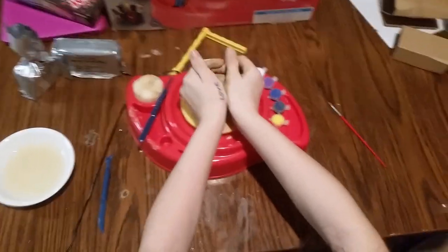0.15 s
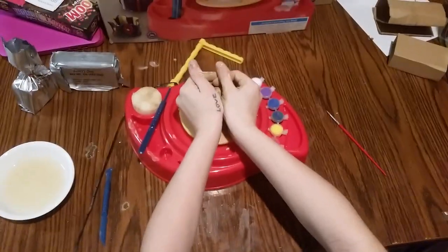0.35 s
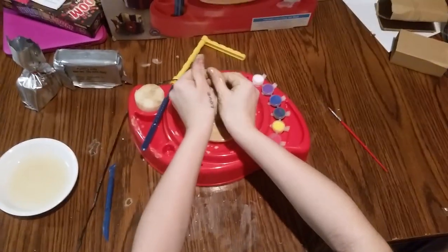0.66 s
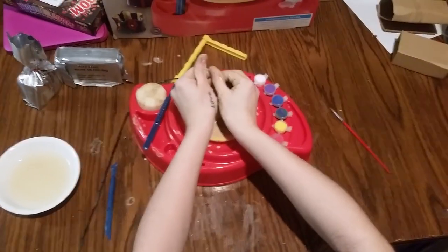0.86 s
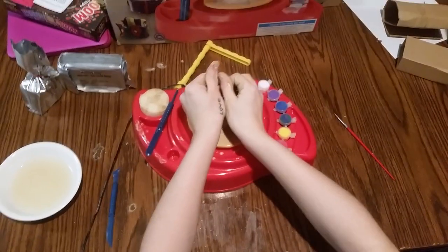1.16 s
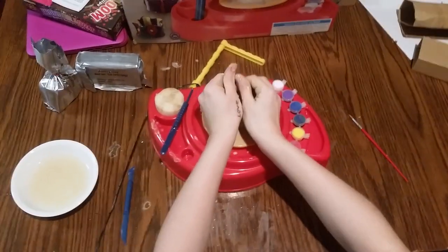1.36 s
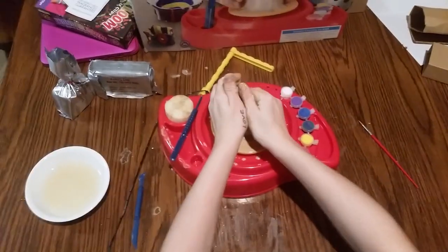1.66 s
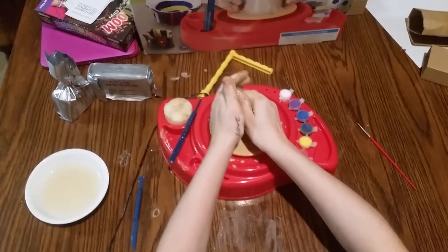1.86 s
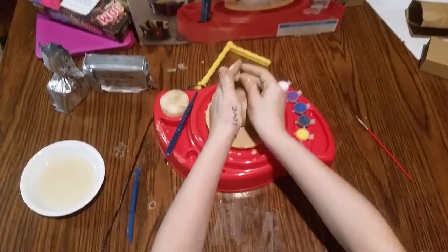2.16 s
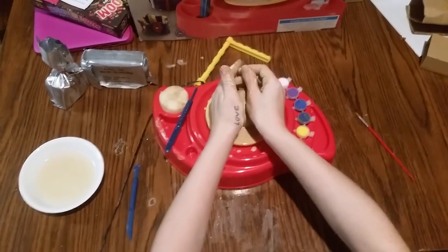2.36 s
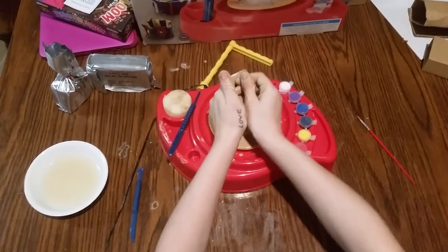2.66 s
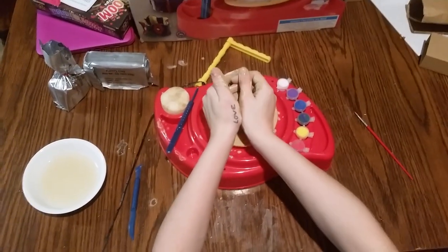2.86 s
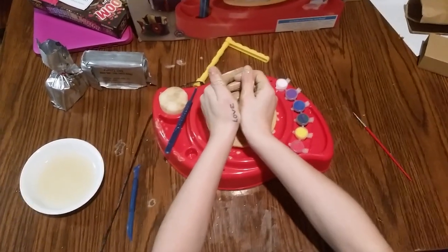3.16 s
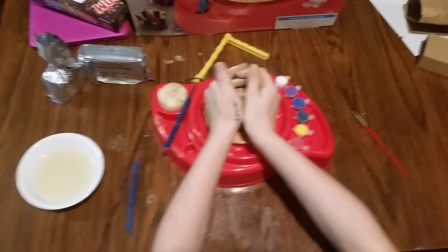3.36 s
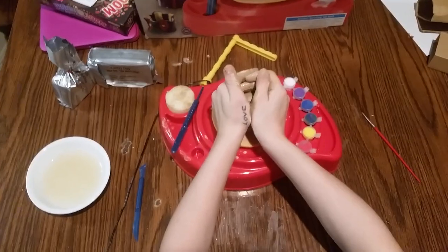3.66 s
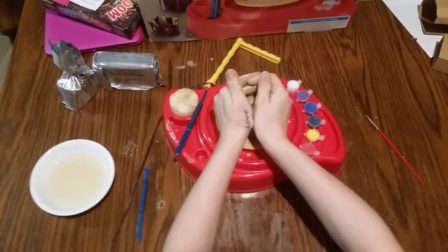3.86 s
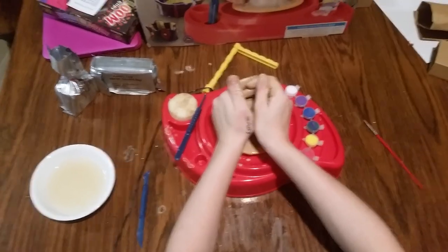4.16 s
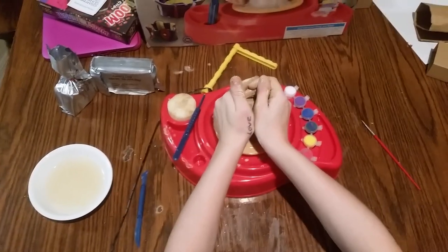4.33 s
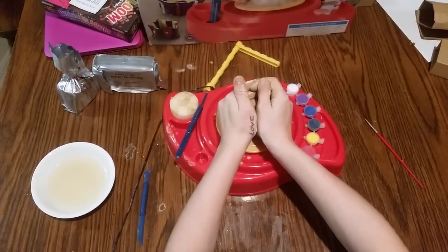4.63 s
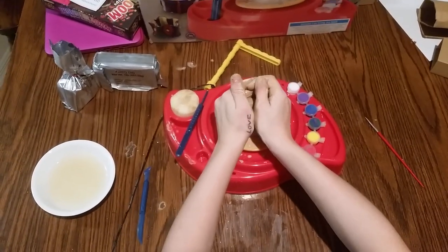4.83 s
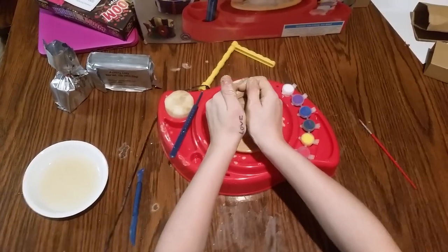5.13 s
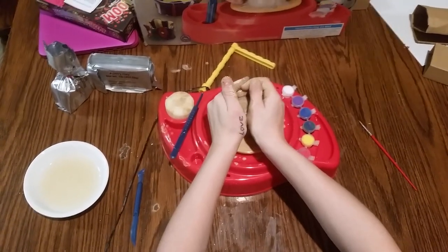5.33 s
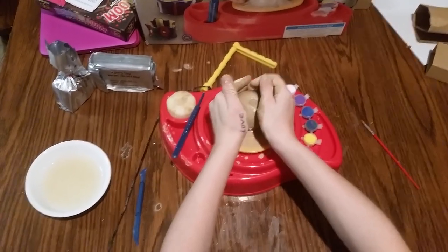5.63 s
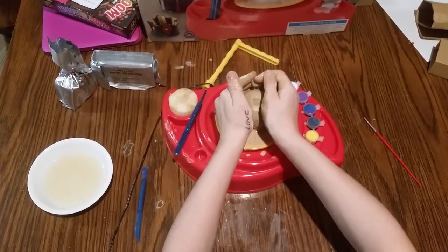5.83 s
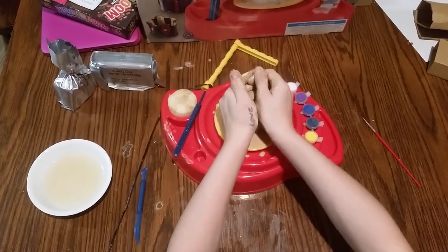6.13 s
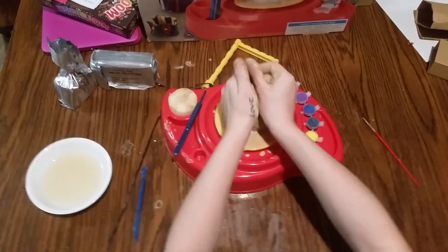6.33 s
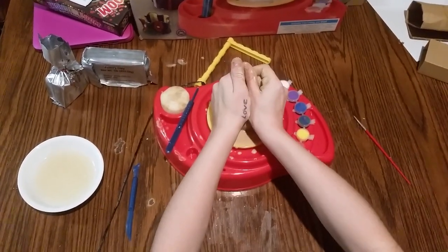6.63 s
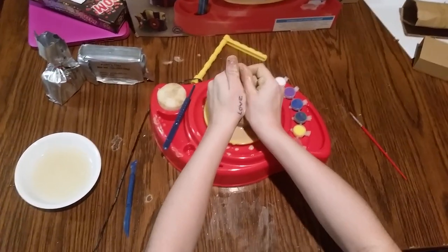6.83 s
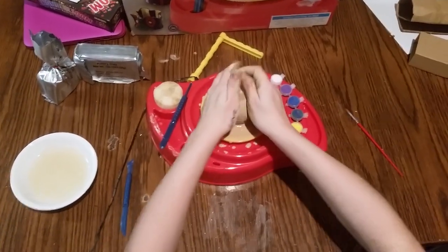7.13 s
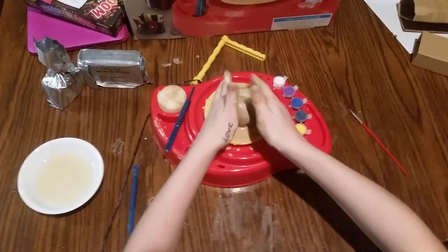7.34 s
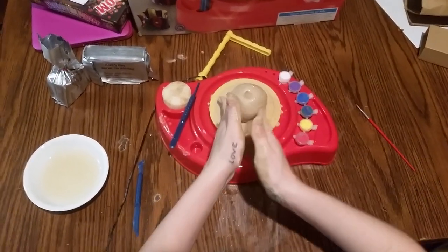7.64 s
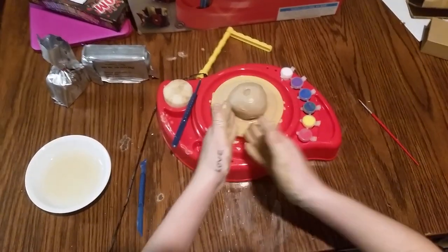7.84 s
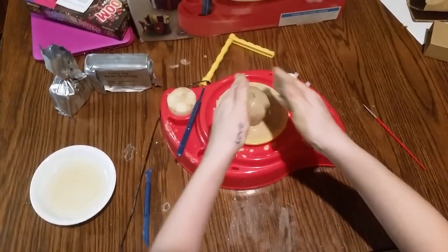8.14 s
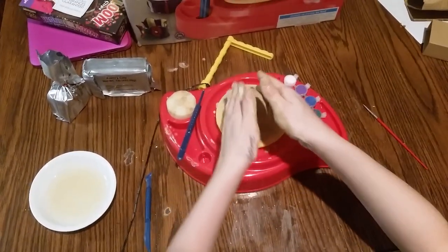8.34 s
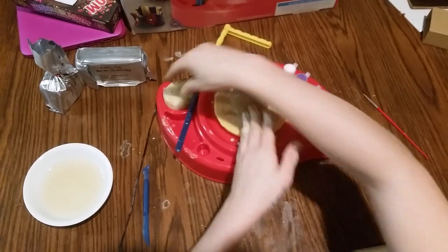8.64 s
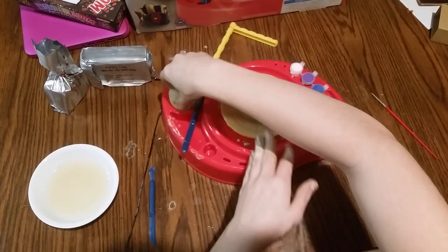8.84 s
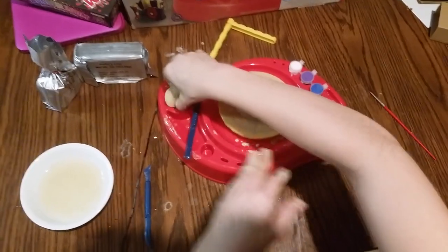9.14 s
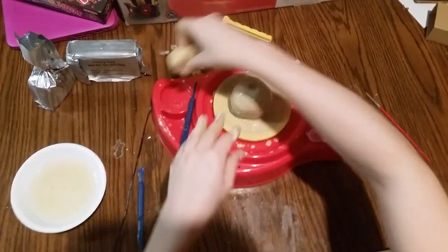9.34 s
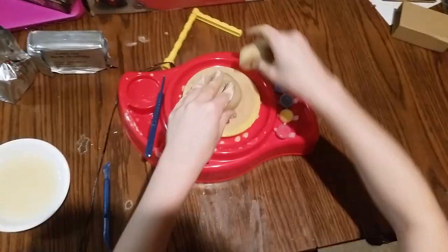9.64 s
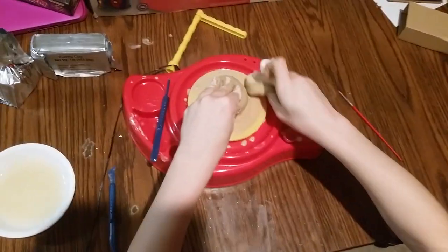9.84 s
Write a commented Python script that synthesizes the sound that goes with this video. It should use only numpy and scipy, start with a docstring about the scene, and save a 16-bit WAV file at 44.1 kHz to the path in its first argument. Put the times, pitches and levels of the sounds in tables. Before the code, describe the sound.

A toy pottery wheel is already running close by in a small room, its little electric motor giving a high whine over rattling plastic gears. The pitch wavers as hands press the clay, and there is faint low drumming on the table. A hollow knock comes right at the start, with soft microphone bumps at about 0.5 and 1.6 seconds. At 5.8 seconds the motor cuts off and quickly falls in pitch to a stop, leaving a faint appliance hum. A light tap follows, then wet palms peel off the clay in small, quiet squelches from 6.3 to 7.4 seconds. At about 7.7 seconds the wheel whines up again for half a second and winds down. From 9 to 9.7 seconds hands knock and clack on the hollow plastic shell several times, loudest around 9.3 to 9.4 seconds, over a very faint rubbing of clay.

```python
"""A toy pottery wheel whines and rattles through its plastic gears, sagging as hands press the clay.
The pedal is let go, pressed once more and let go again; each time the gears coast to a stop.
Wet palms squelch off the clay, hands knock on the plastic shell, and the off-centre clay drums on
the wooden table. Now and then the camera is bumped. Appliances hum in the small room."""
import sys
import numpy as np
from scipy import signal
from scipy.fft import rfft, irfft, next_fast_len
from scipy.io import wavfile
from scipy.ndimage import map_coordinates

SR = 44100
rng = np.random.default_rng(int(sys.argv[2]) if len(sys.argv) > 2 else 0)


def wrap_up_sound(samples):
    """Save the sound to the file named by the first command line argument, as 16-bit audio."""
    columns = np.atleast_2d(samples).T
    # keep every value between -1 and 1, then stretch to whole-number steps
    tamed = np.clip(columns, -1, 1)
    steps = np.round(tamed * 32767).astype(np.int16)
    wavfile.write(sys.argv[1], SR, steps)


N = 440559
TEETH = 10  # on the motor's gear
TAUT_DB = -5  # the pull of starting up holds the teeth together and quiets them


# How much louder the wheel is on the left than on the right: f/Hz, level/dB
WHEEL_BALANCE = [(100, -7), (400, 3.5), (1000, 2), (1600, 5), (2300, 0.5), (3000, 2), (5200, 2.5),
                 (6500, 7), (7800, 14.5), (8800, 24.5), (9500, 5), (11200, 1.5), (12500, -10),
                 (14500, -4.5)]
def wheel(lag_samples=2.4):
    """The gears' tones and their noise, both reaching the right side a little later than the left."""
    def to_sides(hz):
        gains = amp(np.outer([1, -1], along(WHEEL_BALANCE, hz)) / 2)
        delay = np.exp(-2j * np.pi * np.outer([0, lag_samples], hz) / SR)
        return gains / np.sqrt(np.mean(gains ** 2, axis=0)) * delay
    reached, kept = pedal()
    pace = reached * kept  # 0 is standing still, 1 is full speed
    speed, turns = shaft(pace)
    _, lean_db = run_settings()
    noise = amp(TAUT_DB * (1 - reached)) * rattle(pace, turns) + rasp(pace, turns)
    noise = amp(np.outer([1, -1], lean_db) / 2) * hand_gap(noise)
    return filtered(whine(speed, pace, kept, turns), to_sides), filtered(noise, to_sides)


# How loud the teeth's main note is: t/s, level/dB
WHINE_LEVEL = [(0.0, -20.7), (2.44, -16.7), (2.9, -23), (3.22, -16.5), (3.33, -23), (3.57, -17),
               (3.65, -23), (3.74, -19.5), (3.98, -24), (4.07, -19.5), (4.32, -17.5), (4.76, -18.2),
               (4.9, -27), (5.26, -18.2), (5.66, -15.5), (5.8, -22.5), (7.77, -19.3), (8.14, -19)]
# Weaker notes from the other gears: multiple of the shaft speed, level/dB
GEAR_NOTES = [(2, -51), (2.5, -55.5), (3, -55), (6, -50), (6.25, -50), (7, -47), (9.8, -37), (10.2, -37),
              (10.4, -40), (11, -41), (19, -42)]
# How strongly the gearbox rings as a note slides through it: f/Hz, level/dB
GEARBOX_RING = [(1150, 1), (1350, -11), (1460, 0), (1700, -4), (2200, 0), (2450, -3), (2680, 4), (3020, 0),
                (3170, -15), (3850, -2), (4400, -16)]
def whine(speed, pace, kept, turns, coast_db=-21.5, loose_at=.12, slip_rate=45, slip_db=-5.5):
    """Gear teeth meet so fast that they sing; when coasting they go loose and slap out higher notes."""
    tooth_db, = curves(WHINE_LEVEL)
    octave_db, _ = run_settings()
    rattle_db, = curves(RATTLE_LEVEL)
    slack = np.minimum(1 - pace, .45)
    loose = np.minimum((1 - kept) / loose_at, 1)
    thin_db = -23 * (1 - pace)  # a small shell is poor at low notes
    slip = np.maximum(wobble(slip_rate) - 1, 0)  # strained teeth ride apart for a moment
    play = (.04 + .5 * slack) * wobble(380)  # slack teeth meet early or late
    play += .19 * (1 + 2 * slip) * wobble(2 * slip_rate)
    ring_db = lambda multiple: along(GEARBOX_RING, multiple * speed)
    tooth_db += (coast_db - tooth_db) * loose
    octave_db += (-23 - octave_db) * np.minimum((1 - pace) / loose_at, 1)
    notes = [(TEETH, tooth_db + thin_db + slip_db * slip),
             (TEETH - 1, -26 + thin_db + ring_db(TEETH - 1)),
             (2 * TEETH, octave_db + ring_db(2 * TEETH) + wobble(4) + slip_db * slip / 2)]
    slap_db = -30.5 - 10 * (1 - loose)
    notes += [(k * TEETH, slap_db + ring_db(k * TEETH)) for k in range(3, 6)]
    gears_db = 1.5 + thin_db + .5 * (rattle_db - rattle_db.max())
    notes += [(multiple, db + gears_db + 2.5 * wobble(5)) for multiple, db in GEAR_NOTES]
    tones = np.zeros((2, N))
    for multiple, db in notes:
        phase = multiple * (2 * np.pi * turns + play / TEETH) + 2 * np.pi * rng.random()
        flutter_db = (1.15 + 5 * slack) * wobble(55)
        tones += amp(db + flutter_db) * np.sin([phase, phase + .47 * wobble(3)])
    taut = amp(TAUT_DB * np.minimum(2 * (kept - pace), 1))
    singing = np.clip((pace - .12) / .3, 0, 1)  # very slow teeth stop singing
    return hollow_base(np.sqrt(2) * tones * hand_shade() * taut * singing)


def hollow_base(tones, note_hz=380, width_hz=22, boom_db=1):
    """The hollow base booms as the slowing teeth pass through its own note."""
    return filtered(tones, lambda hz: 1 + amp(boom_db) * resonance(hz, note_hz, width_hz))


# How loud the rattle is at full speed: t/s, level/dB
RATTLE_LEVEL = [(0.0, -27), (0.37, -30), (0.55, -26), (1.05, -26), (2.39, -22.5), (5.17, -24), (5.8, -23),
                (7.75, -28), (8.13, -24)]
# The gearbox's tone colour, first its body and then its high hiss: f/Hz, level/dB
GEARBOX_BODY = [(60, -53.5), (130, -24.5), (250, -21), (320, -9), (480, -10.5), (680, -9.5), (850, -1.8),
                (1450, 1.5), (1900, -2.5), (2550, 3.5), (3000, 0), (3400, -5.5)]
GEARBOX_HISS = [(3950, -4.5), (4350, -9), (5400, -10.5), (6200, -6.5), (7100, -6), (7550, -2), (8600, -13),
                (10000, -13), (10700, -9.5), (11400, -9.5), (12400, -3.5), (13600, -7.5)]
def rattle(pace, turns, clash_db=-4, clatter_db=4, level_db=5.2):
    """Loose teeth clash and slide, ringing the gearbox; slow gears sound uneven and dull, then fade."""
    rattle_db, = curves(RATTLE_LEVEL)
    contacts = np.flatnonzero(np.diff(np.floor(TEETH * turns)))
    late = rng.uniform(0, SR / 1500, (2, len(contacts))).astype(int)  # gaps between teeth delay each hit
    force = rng.standard_normal(late.shape)
    clashes = np.array([np.bincount(contacts + d, f, N)[:N] for d, f in zip(late, force)])
    sliding = np.minimum(8 * pace, 1) * rng.standard_normal((2, N))
    idler = np.sin(2 * np.pi * turns * 2 / 5)  # a slower in-between gear
    throb_db = 1.35 * idler + .63 * np.sin(2 * np.pi * turns) + .8 * wobble(30)
    uneven_db = clatter_db * np.minimum(2 * (1 - pace), 1) * (wobble(160) - .5)
    drive = (amp(clash_db) * unit(clashes) + sliding) * amp(throb_db + uneven_db)
    sound = spread(drive, GEARBOX_BODY + GEARBOX_HISS)
    lows = filtered(sound, lambda hz: 1 / (1 + (hz / 3000) ** 6))
    highs = (sound - lows) * amp(-4 * (1 - pace) + .6 * wobble(8))
    lows *= amp(-2.8 + 4.6 * (1 - pace))
    fade = np.minimum(pace / .46, 1) ** 1.5
    return fade * amp(rattle_db + level_db) * (highs + lows)


# The teeth's blurred notes: multiple of the main note, width/Hz, level/dB
RASP_BANDS = [(1, 200, -31.5), (3, 70, -37.5), (4, 120, -46), (5, 420, -35.5), (5.95, 380, -37),
              (7.9, 240, -34.5), (8.4, 260, -40)]
def rasp(pace, turns, wander_db=2.5, wander_rate=3):
    """Uneven teeth smear their notes into narrow bands of noise that follow the speed."""
    def band(multiple, width):
        blur = wobble(width) + 1j * wobble(width)
        return np.real(blur * np.exp(2j * np.pi * multiple * TEETH * turns))
    rattle_db, = curves(RATTLE_LEVEL)
    bands = np.zeros((2, N))
    for multiple, width, db in RASP_BANDS:
        swell = amp(db + wander_db * wobble(wander_rate))
        bands += swell * np.array([band(multiple, width), band(multiple, width)])
    return amp(rattle_db - rattle_db.max()) * pace ** 2 * bands


# The teeth's main note at full speed, sagging as the hands drag on the clay: t/s, f/Hz
TOOTH_PITCH = [(0.0, 1568), (0.22, 1503), (0.36, 1519), (0.62, 1657), (0.78, 1609), (1.06, 1575),
               (1.44, 1602), (1.52, 1638), (1.92, 1541), (2.36, 1608), (2.76, 1585), (2.8, 1525),
               (3.28, 1523), (3.44, 1572), (3.6, 1595), (3.7, 1531), (4.58, 1525), (4.7, 1506), (5.3, 1515),
               (5.6, 1545), (5.8, 1515), (7.77, 1525)]
def shaft(pace):
    """The shaft's turns per second and its turns so far; lumpy clay makes the speed flutter."""
    tooth_hz, = curves(TOOTH_PITCH)
    flutter = 1 + .0028 * wobble(22) + .004 * wobble(170)
    speed = pace * tooth_hz / TEETH * flutter
    return speed, np.cumsum(speed) / SR


# Pedal presses: down t/s, up t/s, coasting time/s, octave level/dB, rattle's left-over-right level/dB
PRESSES = [(-1, 5.822, .192, -22, 0), (7.66, 8.156, .21, -27, 2)]
def pedal(spin_up_s=.09, coast_power=1.3):
    """The share of full speed reached since each press, and the share kept since letting go."""
    t = np.arange(N) / SR
    reached, kept = np.zeros(N), np.zeros(N)
    for pressed, released, coast_s, *_ in PRESSES:
        rising = 1 - np.clip(1 - (t - pressed) / spin_up_s, 0, 1) ** 2
        falling = np.clip(1 - (t - released) / coast_s, 0, 1) ** coast_power
        reached = np.where(t > pressed, rising, reached)
        kept = np.where(t > pressed, falling, kept)
    return reached, kept


def run_settings():
    """The level of the whine's octave and the rattle's lean to the left, held through each press."""
    return curves([(s, *values) for down, up, _, *values in PRESSES for s in (down, up)])


# How far the hands tip the whine to the left: t/s, level/dB
HAND_SHADE = [(.7, 9), (1.0, 0), (5.8, 1.5), (7.7, 6.5)]
def hand_shade():
    """Left and right gains for the whine: the hands block one side more than the other."""
    shade_db, = curves(HAND_SHADE)
    gains = amp(np.outer([1, -1], shade_db + 1.5 * wobble(4)) / 2)
    return gains / gains.mean(axis=0)


def hand_gap(noise, share=.55, centre_hz=2900, width_hz=950):
    """When the hands let more whine out to the left, the rattle's bright middle comes with it."""
    shade_db, = curves(HAND_SHADE)
    band = filtered(noise, lambda hz: np.exp(-((hz - centre_hz) / width_hz) ** 2))
    return noise + band * (amp(np.outer([1, 0], share * shade_db)) - 1)


# Hands hitting the shell: t/s, peak level/dB, deep knock level/dB, sharp clack level/dB
SHELL_HITS = [(0.066, -19, -4, -25), (6.162, -39, -20, -14), (9.012, -31, -4, -21), (9.1, -42, -12, -14),
              (9.307, -12.5, -2, -9), (9.38, -11.5, -7, -17), (9.405, -17, -10, -14),
              (9.532, -24.5, -20, -13), (9.554, -31, -8, -18), (9.664, -37, -14, -15)]
# The notes the plastic shell rings at: f/Hz, width/Hz, level/dB
SHELL_NOTES = [(210, 170, 1), (405, 45, 11), (520, 120, 7), (980, 260, 0), (1350, 260, -1), (2120, 300, 0),
               (3800, 110, -8), (6900, 500, -13)]
def knocks(deep_db=8, clack_db=13, buzz=.026, buzz_s=.17, delay_s=.0015, contact_hz=2700):
    """One sharp push rings and buzzes the shell: palms wake its deep notes, nails its high ones."""
    out, t = np.zeros(N + SR), np.arange(SR // 4) / SR
    f = np.fft.rfftfreq(len(t), 1 / SR)
    for s, db, knock_db, nail_db in SHELL_HITS:
        hard_db = nail_db + clack_db
        chatter = buzz * amp(hard_db / 2 - 60 * t / buzz_s) * rng.standard_normal(len(t))
        colour = [(550, knock_db + deep_db), (800, 0), (1400, 0), (2200, hard_db)]
        shell = sum(amp(level + along(colour, hz)) * resonance(f, hz, width)
                    for hz, width, level in SHELL_NOTES)
        soft = 1j * f / (contact_hz * amp(db / 6 + hard_db / 2))  # a gentle, fleshy touch sounds duller
        push = rfft((t == 0) + chatter) / (1 + np.sqrt(2) * soft + soft ** 2)
        hit = irfft(push * shell, len(t))
        out[round((s + delay_s) * SR):][:len(t)] += amp(db) * hit / np.max(np.abs(hit))
    return np.array([out[:N], out[:N]])


# Wet palms coming off the clay: t/s, level/dB, time to die away/s
PEELS = [(6.309, -36.5, .09), (6.503, -51, .15), (6.578, -38.5, .16), (6.612, -44, .14),
         (6.684, -41.5, .07), (6.75, -36, .07), (6.781, -37.5, .17), (6.895, -39, .09), (7.104, -42, .06),
         (7.138, -44.5, .08), (7.399, -37.5, .05)]
# The tone colour of the squelches: f/Hz, level/dB
SQUELCH_COLOUR = [(250, -14), (560, -6), (760, 2), (1050, -3), (1400, -15), (1900, -18), (2350, -10),
                  (3200, -34), (3800, -26), (4600, -43), (9000, -56)]
def squelches(rise_s=.0009, smack_s=.032, peel_db=-11, grain_db=3, grain_rate=450):
    """Wet clay lets go of the skin with a smack, then peels off in tiny pops inside the cupped hands."""
    t = np.arange(N) / SR
    loudness = np.zeros(N)
    for s, db, peel_s in PEELS:
        age = np.maximum(t - s, 0)
        smack = amp(-60 * age / smack_s)
        peel = amp(peel_db - 60 * age / peel_s)
        loudness += amp(db) * (smack + peel) * (1 - np.exp(-age / rise_s))
    pops = unit(rng.standard_normal((2, N)) * amp(grain_db * wobble(grain_rate)))
    return np.sqrt(2) * loudness * spread(pops, SQUELCH_COLOUR)


# Fingers on the clay: start t/s, end t/s, level/dB
FINGER_RUBS = [(9.1, 9.7, -61)]
def rubbing(fade_s=.14):
    """Fingers rub and pull the damp clay with a faint, grainy rustle."""
    t = np.arange(N) / SR
    loudness = sum(amp(db) * np.clip(np.minimum(t - start, end - t) / fade_s, 0, 1)
                   for start, end, db in FINGER_RUBS)
    grains = rng.standard_normal((2, N)) * amp(4 * wobble(300))
    colour = [(300, -2), (1600, -3), (2300, 3), (2900, -11), (3800, -2.5), (4600, -15), (9000, -24.5)]
    return loudness * spread(grains, colour)


def drumming(pace, level_db=-51, uneven_db=6, settle_s=1.5, early_db=-9):
    """The off-centre clay drags on the hands and drums unevenly on the table, softly at first."""
    drum = spread(rng.standard_normal((2, N)), [(50, -44), (92, 1.5), (135, 1), (200, -7), (300, -30)])
    early = np.clip(1 - np.arange(N) / SR / settle_s, 0, 1) ** .5
    return amp(level_db + early_db * early + uneven_db * np.minimum(wobble(7), 1)) * pace * drum


# Nudges to the table and the camera: t/s, level/dB, f/Hz, length/s
NUDGES = [(0.064, -20.5, 120, 0.012), (0.527, -36.5, 60, 0.024), (1.61, -33.5, 145, 0.079),
          (6.52, -40, 55, 0.1)]
def bumps():
    """Each nudge is a short, dull push: a low note that swells and fades."""
    out = np.zeros(N + SR)
    for s, db, hz, length in NUDGES:
        t = np.arange(int(length * SR)) / SR
        out[round(s * SR):][:len(t)] += amp(db) * np.hanning(len(t)) * np.sin(2 * np.pi * hz * t)
    return out[:N]


# The notes of mains power and a compressor: f/Hz, level/dB
HUM_NOTES = [(102.3, -5), (119.8, -2.5), (204.6, -6.5), (240, -4), (409.2, -14.5)]
# The tone colour of the room's air: f/Hz, level/dB
AIR_COLOUR = [(40, -25.5), (110, 3), (170, 1), (260, -0.5), (450, -6), (800, -15.5), (1500, -29),
              (2400, -27.5), (3100, -40), (3800, -31), (5500, -44), (10000, -47.5), (12400, -34.5)]
def background(pace, hum_db=-47.5, air_db=-48.5, rumble_db=-58, sink_db=-11, rumble_sink_db=-23):
    """Appliances hum against each other over soft air noise and rumble; all sink while the motor runs."""
    t = np.arange(N) / SR
    hum = sum(amp(db + wobble(3)) * np.sin(2 * np.pi * hz * t + .2 * wobble(4)) for hz, db in HUM_NOTES)
    air = spread(rng.standard_normal((2, N)), AIR_COLOUR)
    rumble = spread(rng.standard_normal((2, N)), [(18, -15), (55, .5), (100, -11.5), (300, -59.5)])
    rumble *= amp(rumble_db + rumble_sink_db * pace + 2.5 * wobble(8))
    steady = amp(hum_db) * unit(hum) * amp([[1], [-1]]) + amp(air_db) * air
    return amp(sink_db * pace) * steady + rumble


# Brief dips in the low sounds: middle t/s, half length/s, level/dB
LOW_DIPS = [(8.02, .15, -24), (8.7, .36, -8)]
def dips():
    """A gain that makes the drumming and the background fall away for a moment."""
    t = np.arange(N) / SR
    return amp(sum(db * np.exp(-((t - s) / half_s) ** 4) for s, half_s, db in LOW_DIPS))


# How long the room rings: f/Hz, time to fade by 60 dB/s
ECHO_TIMES = [(150, 0.16), (1500, 0.47), (14000, 0.33)]
def room(x):
    """The walls answer with a short echo, a different one on each side."""
    hz, t, noise = signal.stft(rng.standard_normal((2, SR // 2)), SR, nperseg=256)
    fade = amp(-60 * t / along(ECHO_TIMES, hz)[:, None])
    _, tail = signal.istft(noise * fade, SR, nperseg=256)
    tail = np.pad(tail / np.linalg.norm(tail[0]), ((0, 0), (SR // 200, 0)))
    return signal.fftconvolve(x, tail, axes=1)[:, :N]


# How alike left and right are: f/Hz, likeness (1 the same, 0 unrelated, -1 opposite)
LIKENESS = [(100, .4), (380, 0.35), (950, 0.62), (2380, 0.38), (5980, 0.08), (15000, -0.34)]
def spread(pair, colour):
    """Turn two unrelated noises into a partly alike stereo pair with a tone colour (f/Hz, level/dB)."""
    def response(hz):
        angle = np.arccos(np.clip(along(LIKENESS, hz), -1, 1)) / 2
        return amp(along(colour, hz)) * [np.cos(angle), np.sin(angle)]
    mid, side = filtered(pair, response)
    return unit(np.array([mid + side, mid - side]))


def amp(db):
    """Turn decibels into a gain."""
    return 10 ** (np.asarray(db) / 20)


def unit(x):
    """Scale a sound to an average strength (rms) of 1."""
    return x / np.sqrt(np.mean(x ** 2) + 1e-20)


def along(points, hz):
    """Read between (f/Hz, value) points, spaced as the ear hears pitch."""
    f, values = np.transpose(points)
    return np.interp(np.log(hz + 1), np.log(f + 1), values)


def curves(rows):
    """Join (t/s, values...) rows with straight lines, one curve for each value."""
    s, *columns = np.transpose(sorted(map(tuple, rows)))
    return [np.interp(np.arange(N) / SR, s, column) for column in columns]


def wobble(rate):
    """A smooth curve through `rate` random points a second."""
    return map_coordinates(rng.standard_normal(int(N * rate / SR) + 4), [np.arange(N) * rate / SR])


def resonance(hz, note_hz, width_hz):
    """How something that rings at one note answers each frequency."""
    return 1j * hz * width_hz / (note_hz ** 2 - hz ** 2 + 1j * hz * width_hz)


def filtered(x, response):
    """Multiply each frequency in x by response(hz)."""
    size = next_fast_len(N + SR // 2)
    return irfft(rfft(x, size) * response(np.fft.rfftfreq(size, 1 / SR)), size)[..., :N]


def scene(whine_room_db=-17, rattle_room_db=-11, hands_room_db=-8.5):
    """The wheel and the hands in the room, over its hum."""
    pace = np.prod(pedal(), axis=0)
    tones, noise = wheel()
    hands = knocks() + rubbing() + squelches()
    low = dips() * (drumming(pace) + background(pace))
    echo = room(amp(whine_room_db) * tones + amp(rattle_room_db) * noise + amp(hands_room_db) * hands)
    return tones + noise + hands + echo + bumps() + low


def record(dry, ceiling=.9, top_hz=14580):
    """The camera rounds off the tallest peaks and cuts the very highest treble."""
    rounded = dry / (1 + np.abs(dry / ceiling) ** 8) ** (1 / 8)
    return filtered(rounded, lambda hz: np.clip((top_hz - hz) / 120 + .5, 0, 1))


dry = scene()
out = record(dry)
wrap_up_sound(out)
```